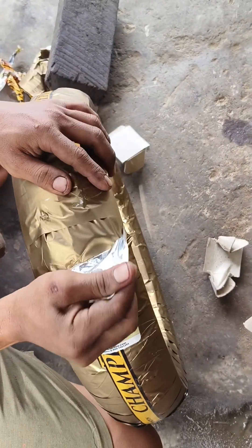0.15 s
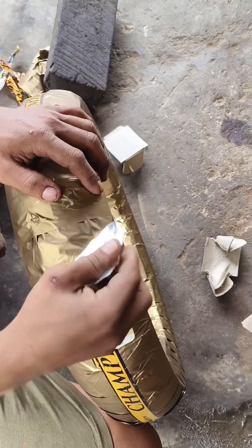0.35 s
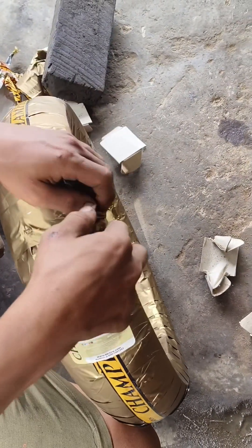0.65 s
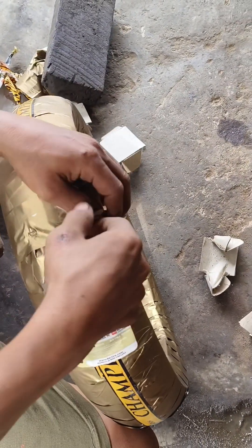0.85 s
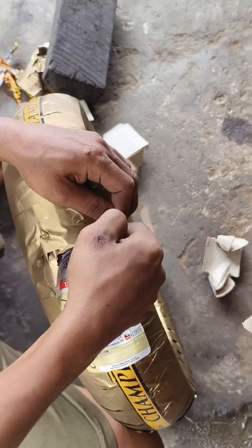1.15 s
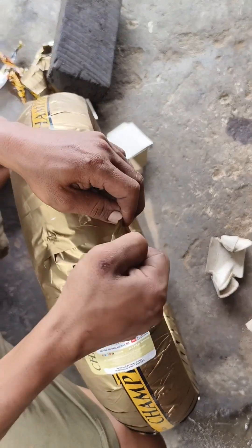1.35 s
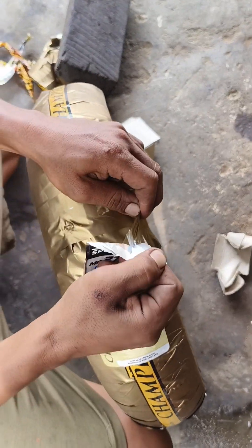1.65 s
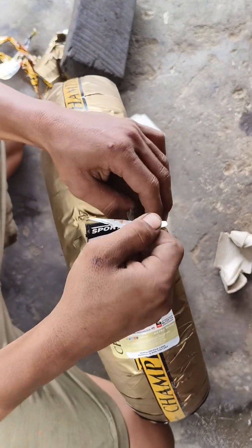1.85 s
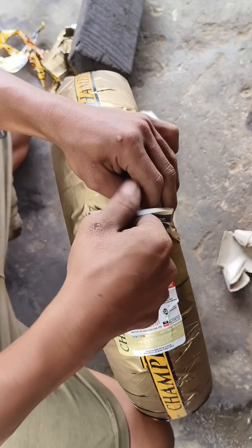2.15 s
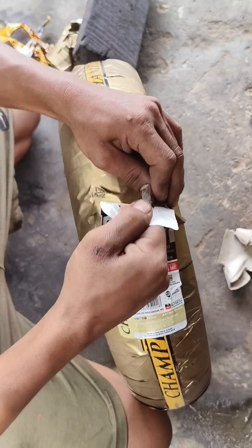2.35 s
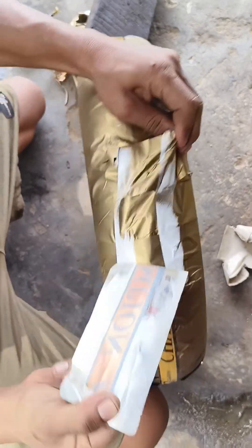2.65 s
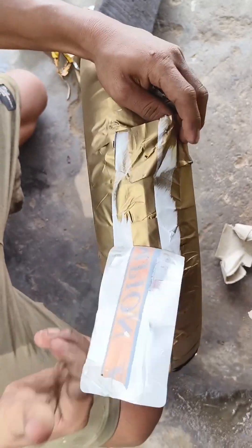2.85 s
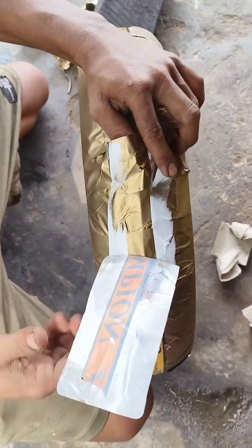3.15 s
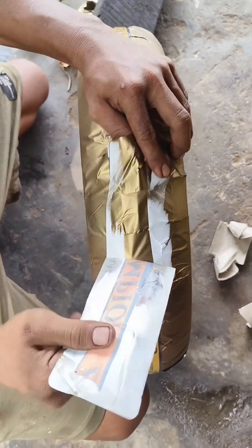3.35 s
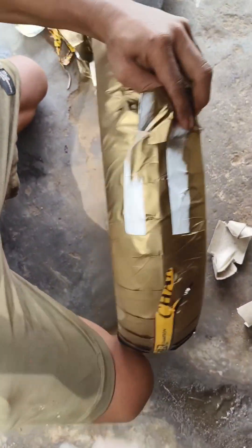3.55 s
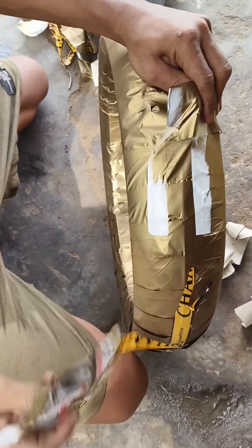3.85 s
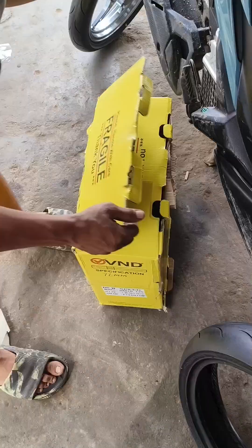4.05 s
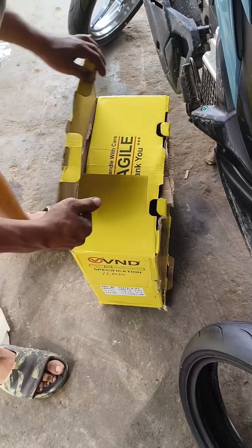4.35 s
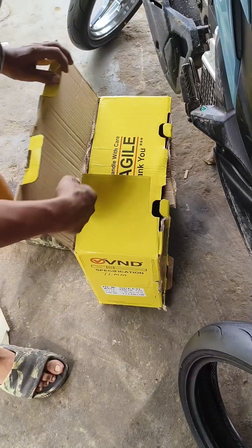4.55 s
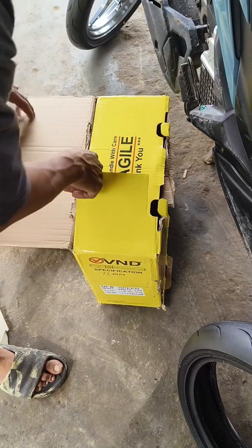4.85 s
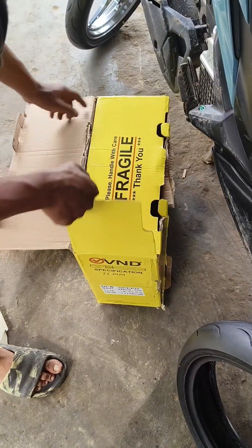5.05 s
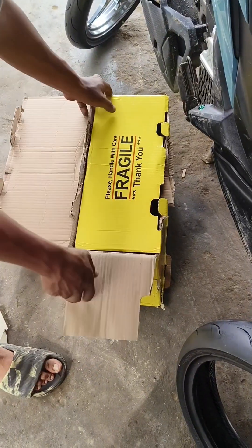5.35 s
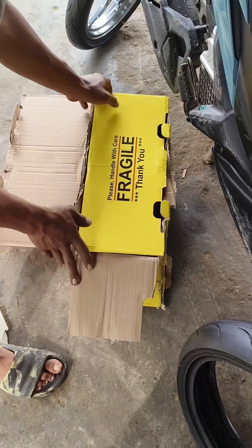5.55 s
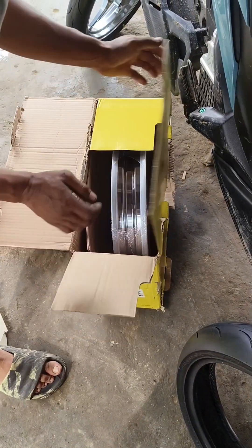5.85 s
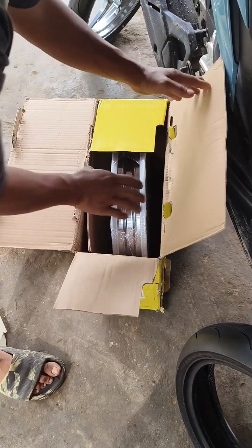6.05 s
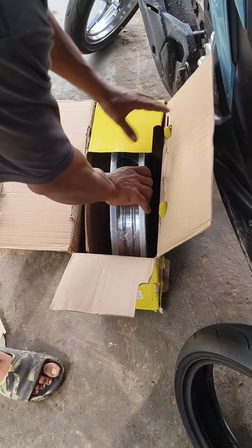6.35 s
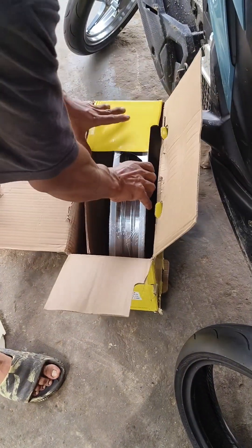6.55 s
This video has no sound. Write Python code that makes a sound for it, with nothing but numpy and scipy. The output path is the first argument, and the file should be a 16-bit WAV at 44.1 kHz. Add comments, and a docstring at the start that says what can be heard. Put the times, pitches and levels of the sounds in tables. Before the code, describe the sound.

From 0 to 1.3 s, fingers softly rub and crinkle glossy wrapping close to the microphone, with a tiny upward squeak near 0.4 s. Quiet hiss, a slow idling engine and motor hum lie behind; a thin bird whistle rises at about 1 s. Sharp, ringing glue snaps cluster at 1.4 s and again at 1.6 s. Around 2.45-2.7 s, a quick stutter of snaps leads into the loudest rip, a fast run of breaking threads with a bassy flutter of the sheet. The background ducks, then swells back, with a faint hollow drone from 3 s. A shorter, brighter tear and soft thud come at 3.5 s. Sparse crinkles continue until silence at 4.07-4.24 s. Then a louder, dull traffic rush continues to 6.7 s with uneven deep rumble, fluttering exhaust beats, and faint cardboard ticks near 4.65 and 5.95 s.

```python
"""Sticky label ripped off a wrapped tyre

Glue lets go in sharp ringing snaps, then fast runs of breaking threads shake the paper sheet, close by.
Fingers rub and crinkle the wrapping in an open workshop; a bird whistles, engines idle outside.
Gain control ducks the background after each loud tear.
After a short silence comes a louder street: filtered-noise rush, exhaust beats, faint cardboard ticks.
"""
import sys
import numpy as np
from scipy import signal
from scipy.fft import rfft, irfft, next_fast_len
from scipy.io import wavfile
from scipy.ndimage import uniform_filter1d

SR = 44100
rng = np.random.default_rng(int(sys.argv[2]) if len(sys.argv) > 2 else 0)


def to_wav(s):
    """Save 16-bit WAV."""
    ch = np.atleast_2d(s).T  # columns
    pcm = np.round(np.clip(ch, -1, 1) * 32767)  # PCM
    wavfile.write(sys.argv[1], SR, pcm.astype(np.int16))


N = 295029
T = np.arange(N) / SR  # seconds

# The silence between workshop and street: start and end in seconds.
SILENCE_S = (4.072, 4.243)


def undb(db):
    """Turn decibels into gain."""
    return 10 ** (np.asarray(db) / 20)


def unit(x):
    """Scale to an rms of one."""
    return x / np.sqrt(np.mean(x ** 2))


def noise():
    """Two unrelated white noises."""
    return rng.standard_normal((2, N))


def walk(rate):
    """Random wavering: normal random values, so many per second, joined by straight lines."""
    knots = rng.standard_normal(1024)
    return np.interp(T * rate, np.arange(len(knots)), knots)


def curves(rows):
    """Every column of a table after the time, joined by straight lines."""
    s, *columns = np.transpose(rows)
    return [np.interp(T, s, column) for column in columns]


def during(rows):
    """One between the first and last time of a table, zero outside."""
    return (T > rows[0][0]) & (T < rows[-1][0])


def envelope(start, length, attack_s, release_s):
    """A straight rise, a hold and an exponential release."""
    rise = np.clip((T - start) / attack_s, 0, 1)
    return rise * np.exp(-np.maximum(T - start - length, 0) / release_s)


def add(track, s, sound):
    """Mix a short sound in at time s."""
    i = int(s * SR)
    track[:, i:i + sound.shape[1]] += sound[:, :N - i]


def colour(x, points, size=4096):
    """Minimum-phase filter of unit energy through (Hz, dB) points, falling away beyond both ends."""
    hz, db = np.transpose(points)
    octave = np.log2(np.maximum(np.arange(size // 2 + 1) * SR / size, 1))
    octaves_outside = np.abs(octave - np.clip(octave, np.log2(hz[0]), np.log2(hz[-1])))
    shape_db = np.interp(octave, np.log2(hz), db) - 18 * octaves_outside
    # folding the cepstrum makes the response causal
    cepstrum = irfft(np.log(undb(shape_db)))
    cepstrum[1:size // 2] *= 2
    cepstrum[size // 2 + 1:] = 0
    response = irfft(np.exp(rfft(cepstrum)))
    response = response[None] / np.linalg.norm(response)
    return signal.oaconvolve(np.atleast_2d(x), response, axes=1)[:, :N]


# Stereo width of diffuse sound. Each row: frequency in Hz, side level over mid level in dB.
DIFFUSE_WIDTH = [(60, -26.5), (110, -18), (200, -16), (380, 0), (700, 5.5), (1290, 3.5), (2380, 1),
                 (4400, 1), (8120, 0.5), (15000, 0.5)]


def spread(pair):
    """Two unrelated signals become a diffuse field: alike in the bass, wide above."""
    hz, db = np.transpose(DIFFUSE_WIDTH)
    n = pair.shape[1]
    size = next_fast_len(n)
    f = np.maximum(np.arange(size // 2 + 1) * SR / size, 1)
    width = undb(np.interp(np.log(f), np.log(hz), db))
    side = irfft(rfft(pair[1], size) * width, size)[:n]
    return np.array([pair[0] + side, pair[0] - side])


def cracks(rows, decay_s, tail_db, tail_s):
    """Each fracture is a tight noise burst with a weaker, longer shiver of the sheet."""
    out, t = np.zeros((2, N)), T[:2048]
    shape = np.exp(-t / decay_s) + undb(tail_db) * np.exp(-t / tail_s)
    for s, db, *_ in rows:
        burst = rng.standard_normal((2, len(t))) * shape
        even = np.linalg.norm(shape) / np.linalg.norm(burst, axis=1, keepdims=True)  # equal energy
        add(out, s, undb(db) * burst * even)
    return out


def grains(rate, scatter_db, decay_s):
    """Fibres and glue threads break at random, a few much harder than the rest."""
    size = undb(scatter_db * np.minimum(rng.exponential(size=N), 3))
    breaks = (rng.random(N) < rate / SR) * size
    energy = signal.lfilter([1], [1, -np.exp(-2 / (decay_s * SR))], breaks ** 2 + 1e-12)
    return unit(np.sqrt(energy) * noise())


# One tug in which the glue sticks and slips in a quick run of snaps: typical values before scatter.
STUTTER_S, SLIP_PERIOD_S = 2.4904, 0.00225
STUTTER_DB, STUTTER_RING_HZ, STUTTER_RING_DB = -4.5, 2970, 1.5


def stutter(jitter=0.12, scatter_db=3.0, ring_scatter=0.19, count=7):
    """Stick and slip: nearly regular snaps of uneven strength and ring in one tug."""
    gap, strength, ring = rng.standard_normal((count, 3)).T
    gaps = SLIP_PERIOD_S * np.exp(jitter * gap)
    times = STUTTER_S + np.cumsum(gaps) - gaps[0]
    levels = STUTTER_DB + scatter_db * strength
    pitches = STUTTER_RING_HZ * np.exp(ring_scatter * ring)
    return [(s, db, hz, STUTTER_RING_DB) for s, db, hz in zip(times, levels, pitches)]


# Glue letting go. Each row: start in seconds, relative level in dB, ring of the taut sheet in Hz,
# ring share in dB.
GLUE_SNAPS = [(1.3895, -1, 2800, -3), (1.3964, -0.5, 2630, -4.5), (1.4070, -3.5, 2900, -14),
              (1.4140, -2.5, 2970, -2), (1.4360, 4, 3000, -16), (1.5895, -17, 2969, 4),
              (1.5943, -1, 2480, 4), (1.6007, 2, 2870, 0.5), (2.4516, -27, 1600, 0.5),
              (2.5335, -11.5, 3500, -9.5), (2.5412, -5, 1590, -4), (2.5650, -11, 2393, -11),
              (2.6087, -10, 1570, 0), (2.612, -7, 1480, -6), (2.6255, -3, 2040, -0.5),
              (2.6346, 5, 2370, -2), (2.645, -1.5, 2680, 11.5), (3.493, -26, 1300, -0.5),
              (3.504, -15, 5830, 0), (3.5130, -16, 5860, 6), (3.5215, -10.5, 5600, -4),
              (3.5338, -4.5, 5200, 1)]
# Tone of the crack. Each row: frequency in Hz, relative level in dB.
SNAP_TONE = [(180, -31.5), (300, -12), (787, -9), (2570, -0.5), (4520, -2), (5340, 3.5), (6100, -5),
             (6960, -3), (10400, -11), (15200, -12.5), (16000, -25.5)]


def snaps(ring_s=0.00033, ring_db=1, crack_db=-2, ring_pan_db=-3.0, crack_pan_db=2):
    """The taut sheet rings for a few cycles at each snap; the ring reaches the left side first."""
    lag_s = 0.00014
    rings, sides = np.zeros((2, N)), np.array([[0.5], [-0.5]])
    t = np.maximum(T[:512] - np.array([[0], [lag_s]]), 0)
    swell = t / ring_s * np.exp(1 - t / ring_s)
    rows = GLUE_SNAPS + stutter()
    for s, db, hz, share_db in rows:
        add(rings, s, undb(db + share_db + ring_db) * swell * np.sin(2 * np.pi * hz * t))
    crack = colour(cracks(rows, decay_s=0.0008, tail_db=-16.5, tail_s=0.0083), SNAP_TONE)
    return rings * undb(ring_pan_db * sides) + crack * undb(crack_db + crack_pan_db * sides)


# Fast rips. Each row: start in seconds, length in seconds, tearing level in dB, sheet flutter level in dB,
# lowest flutter frequency in Hz, threads per second, scatter of thread strength in dB, name of the tone.
FAST_RIPS = [(2.611, 0.0756, -3.5, -7.5, 44.8, 1300, 3, "long"),
             (2.705, .018, -21.5, -44, 52, 1600, 6, "long"),
             (3.493, 0.069, -10, -13, 34, 3100, 9.5, "last")]
# Tone of the rips named "long". Each row: frequency in Hz, relative level in dB.
LONG_RIP_TONE = [(180, -24), (300, 1), (930, -7.5), (1100, -1.5), (1660, -5), (2740, -0.5), (4160, -5.5),
                 (5160, 2), (6410, -7), (7320, -5), (11100, -15), (14500, -14), (16000, -28.5)]
# Tone of the rip named "last". Each row: frequency in Hz, relative level in dB.
LAST_RIP_TONE = [(300, 3.5), (900, 0.5), (1500, -2), (3000, -5), (4500, -10.5), (5000, 2.5), (6500, 3),
                 (9000, 1.5), (11500, -8), (15500, -4)]
# A rip starts at a share of full speed and reaches it after a share of its length.
START_SPEED, SPEED_UP_SHARE = 0.17, 0.52
FLUTTER_POWER = 1.9  # how steeply the flutter grows with the freed length
RIP_RELEASE_S, FLUTTER_RELEASE_S = 0.0023, 0.0051


def rips():
    """Runs of breaking threads, louder as the pull speeds up; the sheet flutters more as it comes free."""
    out, tones = 0, {"long": LONG_RIP_TONE, "last": LAST_RIP_TONE}
    for s, length, tear_db, flutter_db, low_hz, rate, scatter_db, name in FAST_RIPS:
        freed = np.clip((T - s) / length, 0, 1)
        after = np.maximum(T - s - length, 0)
        speed = np.interp(freed, [0, SPEED_UP_SHARE], [START_SPEED, 1]) * (T > s)
        threads = grains(rate, scatter_db, decay_s=0.0015) * speed ** 2 * np.exp(-after / RIP_RELEASE_S)
        air = noise() * freed ** FLUTTER_POWER * np.exp(-after / FLUTTER_RELEASE_S)
        out = out + undb(tear_db) * colour(threads, tones[name])
        out = out + undb(flutter_db) * flutter(air, low_hz, high_hz=180)
    return out


def flutter(x, low_hz=42, high_hz=270):
    """The loose sheet pushes air in a broad, heavily damped bass band."""
    band = signal.butter(2, [low_hz, high_hz], "band", fs=SR, output="sos")
    return signal.sosfilt(band, x) * np.sqrt(SR / 2 / (high_hz - low_hz))  # make up the lost power


# The wrapping drops back against the tyre when part of the label comes free. Each row: start in seconds,
# swing frequency in Hz, swing level in dB, flapping level in dB, decay in seconds.
WRAPPING_THUDS = [(1.436, 65, -19.5, -20.5, 0.009), (3.528, 48, -14.5, -26, 0.017)]


def thud():
    """Each time it is let go, the wrapping swings briefly and flaps the air."""
    out = 0
    for s, hz, db, flap_db, decay_s in WRAPPING_THUDS:
        t = np.maximum(T - s, 0)
        fall = np.exp(-t / decay_s) * (t > 0)
        swing = undb(db) * fall * np.sin(2 * np.pi * hz * t)
        flap = flutter(noise() * (fall + 1e-18) * undb(flap_db))
        out = out + swing + flap
    return out


# Faint crinkling at random moments, as long as the wrapping is held.
CRINKLES_PER_S, CRINKLE_DB, CRINKLE_SCATTER_DB = 12, -45, 2.5


def crinkles():
    """Small creases give way at random moments until the silence."""
    times = np.cumsum(rng.exponential(size=128)) / CRINKLES_PER_S
    levels = CRINKLE_DB + CRINKLE_SCATTER_DB * rng.standard_normal(len(times))
    return [(s, db) for s, db in zip(times, levels) if s < SILENCE_S[0]]


# Fingers stroking paper and cardboard. Each row: start in seconds, length in seconds, relative level in dB.
FINGER_STROKES = [(-.01, 0.063, -39.5), (0.054, 0.11, -46.5), (.146, 0.12, -38.5), (.3, .26, -59.5),
                  (0.703, 0.054, -56), (1.693, 0.057, -45), (2.425, 0.07, -53.5), (4.94, 0.097, -50.5)]
STROKE_ATTACK_S, STROKE_RELEASE_S = 0.035, 0.012
# The loudest creases buckling under the fingers. Each row: start in seconds, relative level in dB.
LOUD_CREASES = [(0.0824, -28.5), (0.128, -29.5), (0.4197, -29.5), (0.4704, -27.5), (0.7146, -30.5),
                (0.7734, -36), (0.857, -29.5), (1.1804, -38), (1.3568, -35), (1.383, -27), (1.579, -26),
                (1.9966, -32.5), (2.036, -38), (2.4157, -33.5), (2.435, -34), (3.1178, -42), (3.4665, -29),
                (3.7618, -36.5), (3.9567, -30)]
# Cardboard flaps ticking. Each row: start in seconds, relative level in dB.
CARDBOARD_TICKS = [(4.64, -30.5), (4.679, -32), (5.915, -30.5), (6.012, -30.5)]
# Tone of the rubbing. Each row: frequency in Hz, relative level in dB.
RUBBING_TONE = [(380, -8.5), (490, 5), (580, 0), (720, -16), (1080, -7), (1270, -16.5), (1500, -4.5),
                (1800, -8), (2150, -4), (3200, -14.5), (4100, -7), (5300, -4), (6200, -10), (9500, -17.5),
                (15500, -23)]
# Tone of creases and ticks. Each row: frequency in Hz, relative level in dB.
CREASE_TONE = [(900, -9), (1600, 2), (3300, -3.5), (5400, 2.5), (7000, -1.5), (9500, -8.5), (15500, -14)]


def handling():
    """Fingers slide in a stream of tiny grains, creases buckle and cardboard ticks."""
    pressure = sum(undb(db) * envelope(s, length, STROKE_ATTACK_S, STROKE_RELEASE_S)
                   for s, length, db in FINGER_STROKES)
    rubbing = grains(rate=3100, scatter_db=3.0, decay_s=0.0017) * pressure
    rows = LOUD_CREASES + crinkles() + CARDBOARD_TICKS
    ticks = colour(cracks(rows, decay_s=0.0013, tail_db=-11.5, tail_s=0.01), CREASE_TONE)
    return spread(colour(rubbing, RUBBING_TONE)) + undb(-4) * ticks


def squeak(s=0.387, hz=1150, glide=5, width_s=0.012, db=-45):
    """A fingertip sticks and slips on the glossy wrapping: a short rough upward squeak."""
    pitch = hz * (1 + glide * np.clip(T - s, -0.05, 0.05) + 0.022 * walk(400))
    swell = np.exp(-((T - s) / width_s) ** 2)
    return undb(db) * swell * np.sin(2 * np.pi * np.cumsum(pitch) / SR)


def room(x, t60_low=0.22, t60_high=0.3, build_s=0.0012, early_s=0.028, early_db=7, treble_db=-2):
    """Floor and tyre return early echoes; the workshop adds a short tail, modelled as decaying noise."""
    t = T[:SR // 2]
    low, high = rng.standard_normal((2, 2, len(t)))
    low = signal.sosfilt(signal.butter(4, 7500, fs=SR, output="sos"), low)
    high = signal.sosfilt(signal.butter(2, 7500, "high", fs=SR, output="sos"), high)
    tail = low * undb(-60 * t / t60_low) + high * undb(treble_db - 60 * t / t60_high)
    build_up = 1 - np.exp(-(t / build_s) ** 2)
    early_boost = 1 + undb(early_db) * np.exp(-t / early_s)
    tail = tail * build_up * early_boost
    tail = signal.sosfilt(signal.butter(1, 900, "high", fs=SR, output="sos"), tail)
    return signal.oaconvolve(np.atleast_2d(x), tail / np.linalg.norm(tail[0]), axes=1)[:, :N]


# A thin rising chirp. Each row: time in seconds, pitch in Hz, relative level in dB.
BIRD_CHIRP = [(.90, 4700, -57), (.935, 5210, -64), (.955, 5320, -42.5), (.99, 5590, -48),
              (1.025, 5920, -45), (1.042, 7100, -52), (1.055, 7260, -75)]


def chirp():
    """A small bird outside gives one upward whistle, wavering in pitch and level."""
    hz, db = curves(BIRD_CHIRP)
    phase = 2 * np.pi * np.cumsum(hz * (1 + 0.011 * walk(140))) / SR
    return undb(db - 3 + 2.9 * walk(110)) * np.sin(phase) * during(BIRD_CHIRP)


def engine(rate_rows, points, ring_s, rough, scatter_db):
    """Every firing sends the same echoing thump, unevenly loud, with a puff of turbulent gas."""
    hz = curves(rate_rows)[0] * (1 + 0.008 * walk(6))
    turns = np.cumsum(hz) / SR
    firings = np.diff(np.floor(turns), prepend=0) * undb(scatter_db * walk(25))
    t = T[:4096]
    echoes = rng.standard_normal(len(t)) * np.exp(-t / ring_s)
    even = irfft(np.exp(1j * np.angle(rfft(echoes))))  # smeared in time, flat in colour
    thumps = unit(signal.oaconvolve(firings, even)[:N])
    gas = unit(noise() * np.exp(-(turns % 1) / hz / ring_s))
    pair = np.array([thumps, np.roll(thumps, 300)])  # a small delay sets the two channels apart
    return spread(colour(pair + rough * gas, points)) / np.hypot(1, rough)


def walls(x, echo_db=-20, count=14):
    """Weak reflections off the nearby floor and walls comb the sound from outside."""
    lags = rng.integers(SR // 700, SR // 70, count)
    echoes = sum((-1) ** k * np.roll(x, lag, axis=1) for k, lag in enumerate(lags))
    return unit(x + undb(echo_db) * echoes)


# Workshop background. Each row: time in seconds, relative levels in dB of hiss, idling engine and motor hum.
YARD_LEVELS = [(0, -45.5, -47, -53), (1.3, -43.5, -43, -46.5), (2.4, -43, -43.5, -50),
               (2.8, -43, -52.5, -44), (4.07, -43, -58, -49.5)]
# Tone of the hiss. Each row: frequency in Hz, relative level in dB.
YARD_TONE = [(30, -15.5), (80, 13), (250, 8), (450, -3.5), (700, -3.5), (1150, -1), (1450, -3), (1700, -4),
             (2300, -7.5), (2850, -3.5), (3800, -15), (5300, -13), (8000, -23.5), (11000, -33.5),
             (15500, -37)]
# Firing rate of the idling engine. Each row: time in seconds, mean rate in Hz.
IDLE_FIRING = [(0, 14.2), (1.3, 15.5), (1.9, 15.1), (4.1, 15.2)]
# Tone of the idling engine. Each row: frequency in Hz, relative level in dB.
IDLE_TONE = [(35, -30), (60, -17), (92, 5.5), (125, -3.5), (165, 6.5), (200, -3), (245, -5.5), (340, -13.5),
             (500, -33)]
# Partials of the motor hum. Each row: multiple of the base pitch, relative level in dB.
HUM_PARTIALS = [(1, -2.5), (2, 4), (3, -2.5), (4, 7.5), (6, -16.5), (7, -36.5), (9, -14)]
HUM_HZ = 40.8  # mean base pitch


def yard():
    """Distant hiss, a slowly idling motorcycle and a steadier motor humming in harmonics."""
    hiss_db, idle_db, hum_db = curves(YARD_LEVELS)
    hiss = spread(colour(walls(noise()), YARD_TONE)) * undb(hiss_db - 4.5 + 1.1 * walk(31))
    idle = engine(IDLE_FIRING, IDLE_TONE, ring_s=0.075, rough=0.31, scatter_db=-5.0) * undb(idle_db)
    phase = 2 * np.pi * np.cumsum(HUM_HZ * (1 + 0.0048 * walk(11))) / SR
    hum = unit(sum(undb(db + 2.4 * walk(7.11)) * np.sin(k * phase + 2 * np.pi * rng.random())
                   for k, db in HUM_PARTIALS))
    return hiss + idle + hum * undb(hum_db)


# Resonances of the drone. Each row: frequency in Hz, width in Hz, relative level in dB.
DRONE_RESONANCES = [(660, 20, 0.5), (1030, 83, -0.5), (1700, 700, -6.5)]
DRONE_S, DRONE_LENGTH_S, DRONE_ATTACK_S, DRONE_RELEASE_S = 2.94, 0.45, 0.15, 1.3
DRONE_DB = -51.5  # common gain of the resonances


def drone():
    """A faint, hollow drone of noise through a few resonances sets in far away, wavers and slowly fades."""
    bands = 0
    for hz, width, db in DRONE_RESONANCES:
        band = unit(signal.lfilter(*signal.iirpeak(hz, hz / width, fs=SR), noise()))
        bands = bands + undb(db + 1.6 * walk(8)) * band
    return bands * undb(DRONE_DB) * envelope(DRONE_S, DRONE_LENGTH_S, DRONE_ATTACK_S, DRONE_RELEASE_S)


def whine(hz=12250, width_hz=300, db=-75, start_s=0.45, length_s=1.8, fade_s=0.3, faint_db=-83):
    """A faint, very high whine of narrow-band noise, a little stronger for a while before the long rip."""
    band = signal.butter(2, [hz - width_hz / 2, hz + width_hz / 2], "band", fs=SR, output="sos")
    level = undb(faint_db) + undb(db) * envelope(start_s, length_s, fade_s, fade_s / 2)
    return unit(signal.sosfilt(band, noise())) * level * undb(2 * walk(3.7))


# Tyre rush, loudest near its start as a vehicle goes by. Each row: time in seconds, mean level in dB.
RUSH_LEVEL = [(4.25, -37), (4.35, -32), (4.5, -31), (4.72, -32.5), (5.8, -32.5), (5.95, -32.5), (6.2, -34),
              (6.69, -33.5)]
# Tone of the rush. Each row: frequency in Hz, relative level in dB.
RUSH_TONE = [(100, -33.5), (170, -7), (237, -0.5), (349, -9.5), (452, -14.5), (691, -14), (760, -11.5),
             (1000, -12), (1180, -14), (1450, -20.5), (2020, -22), (3570, -31), (5260, -32.5), (11200, -47),
             (14000, -47.5)]
# Deep rumble. Each row: time in seconds, mean level in dB.
RUMBLE_LEVEL = [(4.25, -47), (4.92, -38.5), (5.1, -32), (5.27, -36.5), (5.53, -28), (5.8, -34), (5.97, -30),
                (6.18, -39), (6.69, -33.5)]
# Tone of the rumble. Each row: frequency in Hz, relative level in dB.
RUMBLE_TONE = [(25, -20), (42, -7), (66, -1), (85, -0.5), (120, -11)]
# Nearer exhaust. Each row: time in seconds, mean level in dB.
EXHAUST_LEVEL = [(4.25, -38), (4.48, -30.5), (4.75, -30.5), (4.87, -39.5), (5.05, -30), (5.25, -39.5),
                 (6.3, -33), (6.5, -29), (6.69, -30.5)]
# Firing rate of the exhaust. Each row: time in seconds, mean rate in Hz.
EXHAUST_FIRING = [(4.2, 23.79), (5, 23.65), (5.7, 22.56), (6.7, 21.58)]
# Tone of the exhaust. Each row: frequency in Hz, relative level in dB.
EXHAUST_TONE = [(70, -4.5), (95, -4), (117, 6), (160, -8), (245, -6), (330, -20)]


def street():
    """Tyre rush and rumble of traffic, with the beat of one nearer exhaust; each wavers on its own."""
    rush_db, rumble_db, exhaust_db = [curves(rows)[0] for rows in (RUSH_LEVEL, RUMBLE_LEVEL, EXHAUST_LEVEL)]
    rush = spread(colour(walls(noise()), RUSH_TONE)) * undb(rush_db + 0.31 * walk(12))
    rumble = spread(colour(noise(), RUMBLE_TONE)) * undb(rumble_db + 2.5 * walk(17))
    beat = engine(EXHAUST_FIRING, EXHAUST_TONE, ring_s=0.022, rough=0.57, scatter_db=0.0)
    return rush + rumble + beat * undb(exhaust_db + 1.3 * walk(7.9))


def scene():
    """Near paper and a far bird, over the yard outside and then, from mid-silence on, the street."""
    paper = snaps() + rips() + thud() + handling() + squeak()
    bird = chirp()
    outside = np.where(T < np.mean(SILENCE_S), yard() + drone() + whine(), street())
    return paper + undb(-8.0) * room(paper) + undb(4.5) * (bird + room(bird)) + outside


THRESHOLD_DB, RATIO, RECOVERY_DB_PER_S = -20.5, 1.94, 14


def gain_control(x):
    """Loud sounds push the gain down at once; it recovers steadily, so the background ducks and swells back."""
    window = int(0.002 * SR)
    power = np.maximum(uniform_filter1d(np.mean(x ** 2, axis=0), window), 1e-12)
    cut_db = np.maximum(10 * np.log10(power) - THRESHOLD_DB, 0) * (1 - 1 / RATIO)
    recovered_db = RECOVERY_DB_PER_S * T
    held_db = np.maximum.accumulate(cut_db + recovered_db) - recovered_db
    return x * undb(-uniform_filter1d(held_db, window))


TOP_HZ = 15900  # highest frequency passed


def record(dry):
    """Gain control rides the level, a silence parts the two moments, peaks are rounded and the top is cut."""
    fade_s = 0.0097
    before = np.clip((SILENCE_S[0] - T) / fade_s + 0.5, 0, 1)
    after = np.clip((T - SILENCE_S[1]) / fade_s + 0.5, 0, 1)
    rounded = np.tanh(gain_control(dry) * (before + after))
    return signal.sosfilt(signal.ellip(8, 0.2, 70, TOP_HZ, fs=SR, output="sos"), rounded)


dry = scene()
out = record(dry)
to_wav(out)
```